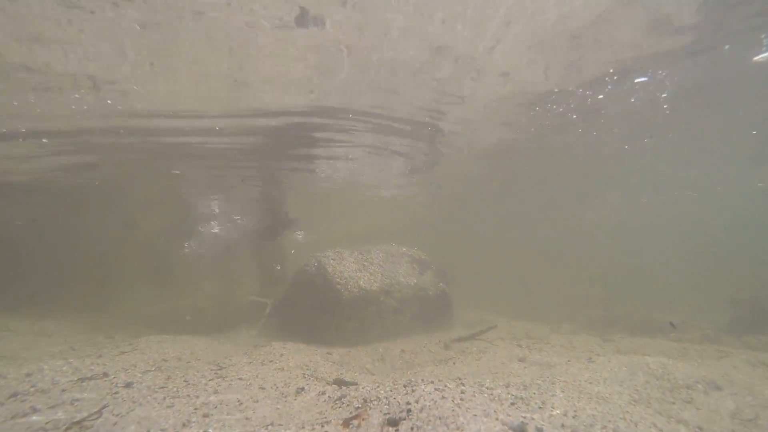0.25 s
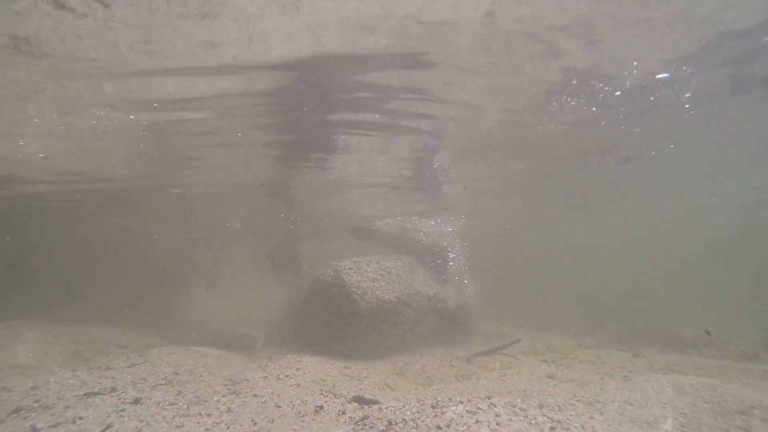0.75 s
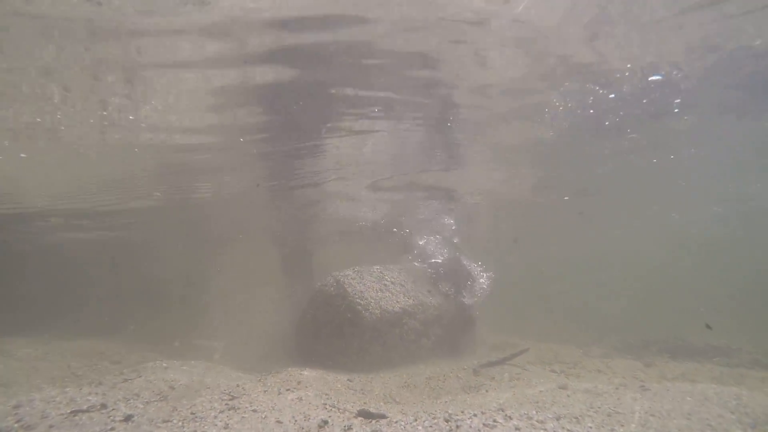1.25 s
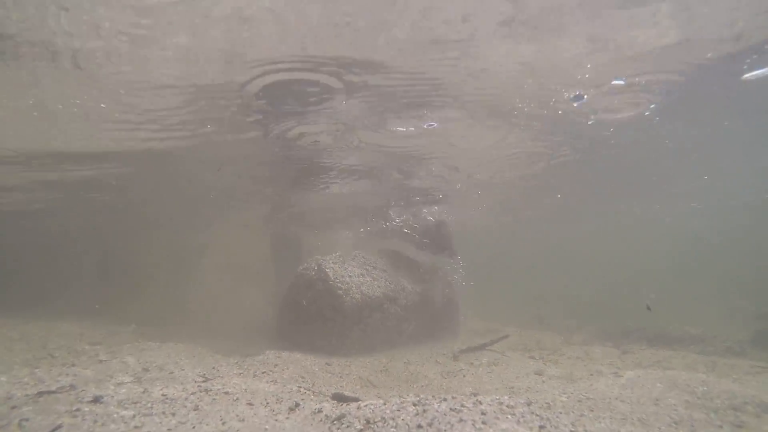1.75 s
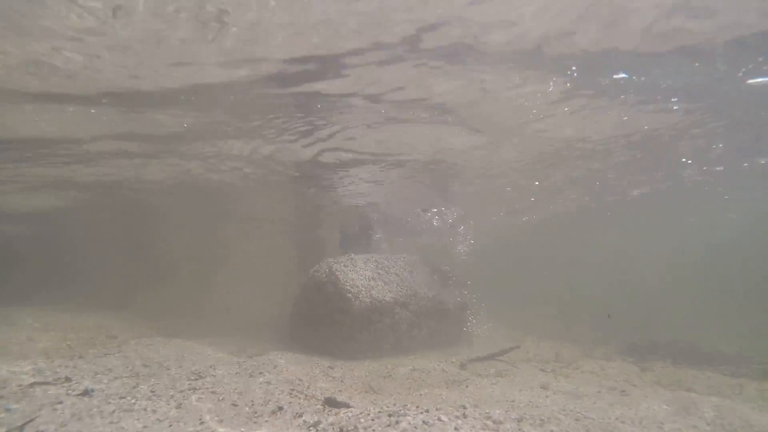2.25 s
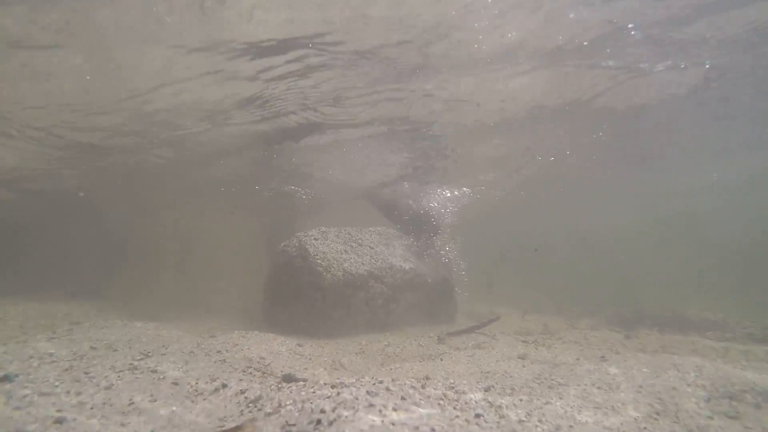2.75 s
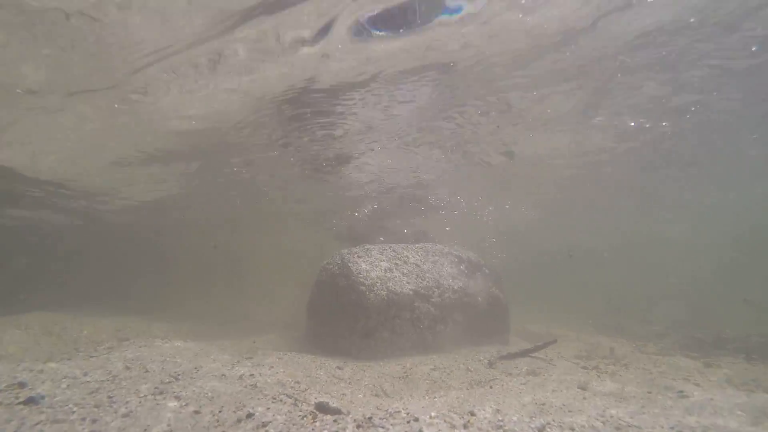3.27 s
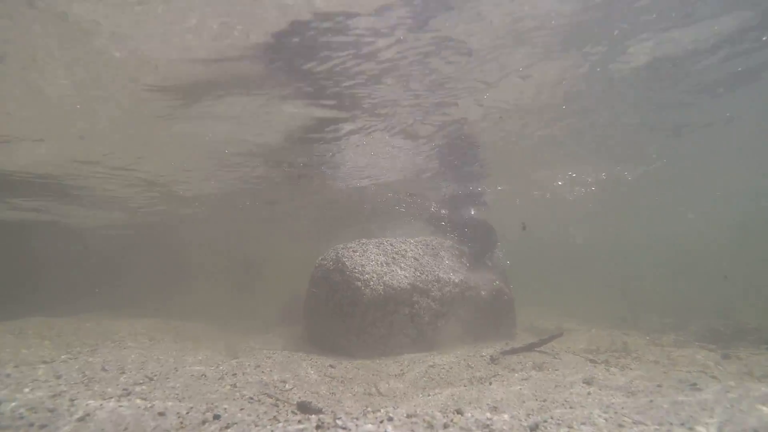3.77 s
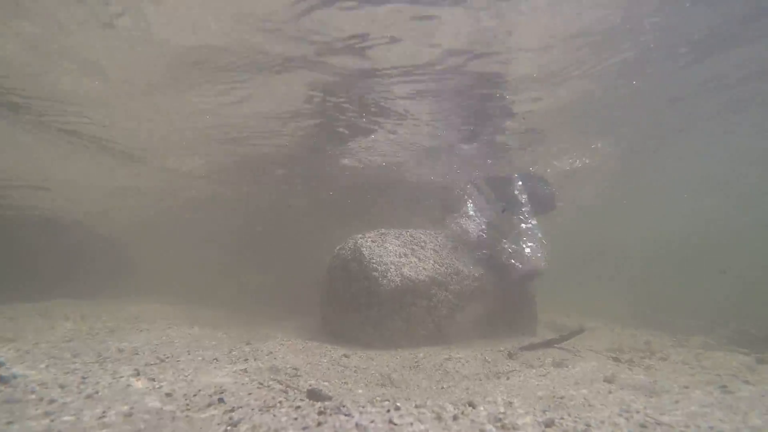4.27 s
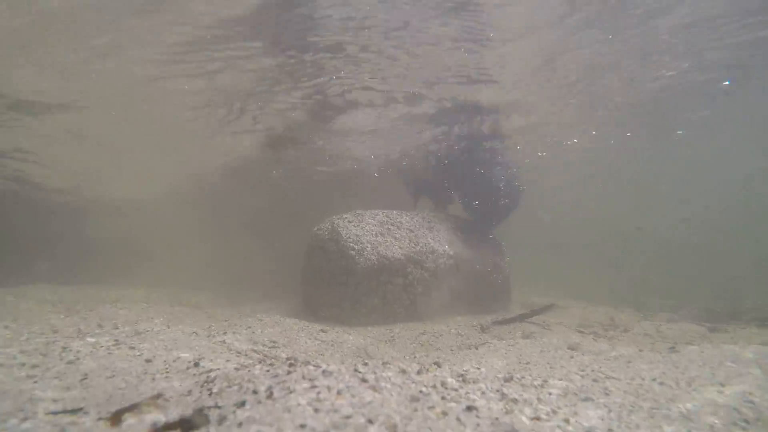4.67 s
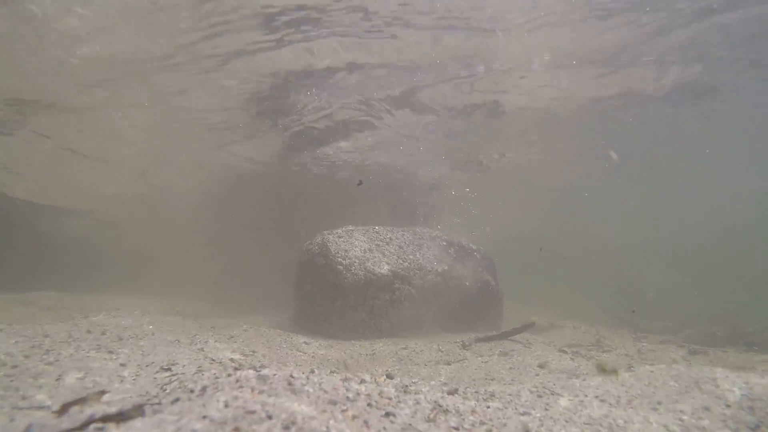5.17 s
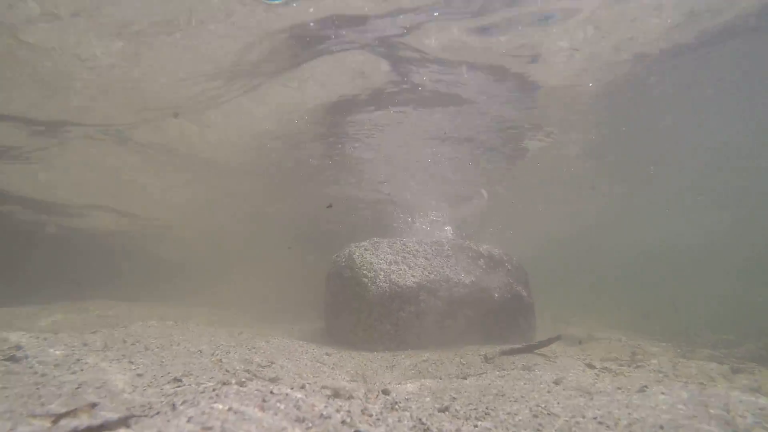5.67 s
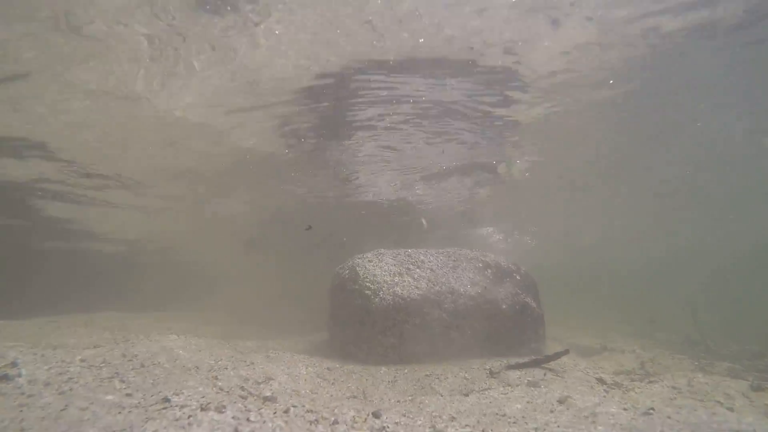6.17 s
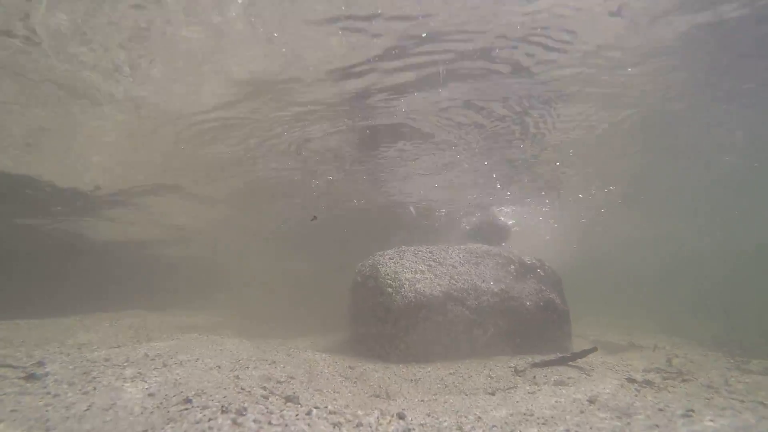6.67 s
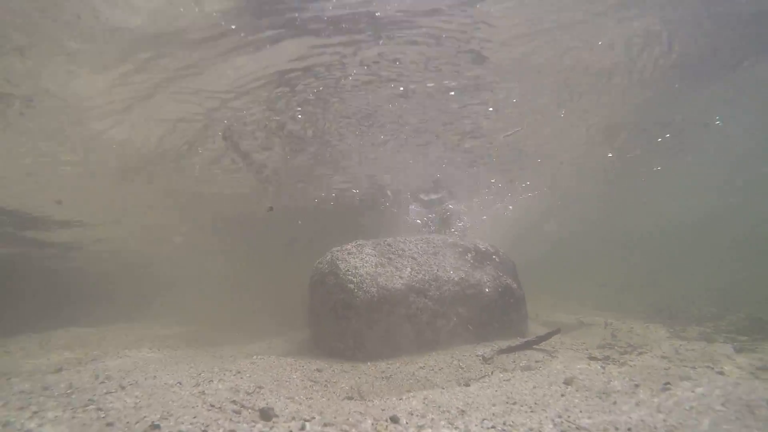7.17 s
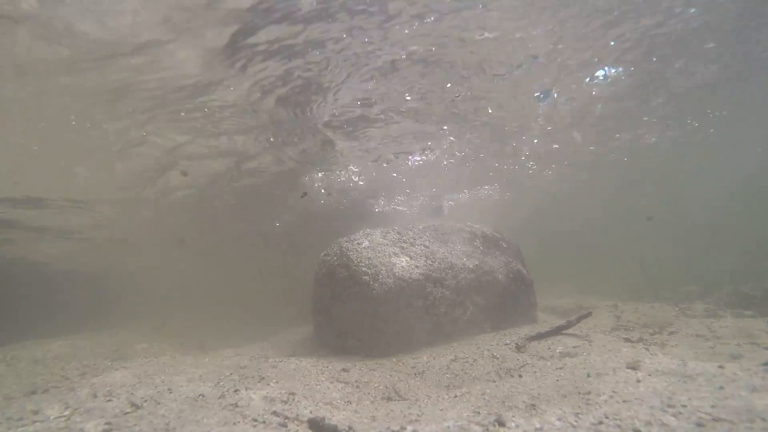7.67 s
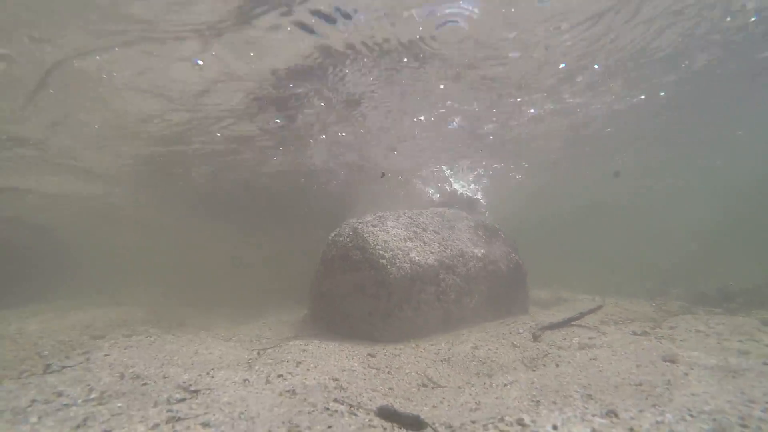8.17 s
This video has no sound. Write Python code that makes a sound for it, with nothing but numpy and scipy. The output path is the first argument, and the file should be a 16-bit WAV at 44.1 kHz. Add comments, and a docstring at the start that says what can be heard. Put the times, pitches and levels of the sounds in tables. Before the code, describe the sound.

A dog claws at a rock in a shallow stream, heard by a microphone in a waterproof housing underwater nearby. Shoved water rumbles and gurgles over a steady hiss and a faint thin whine. Claws slip across the stone in bright, gritty bursts, with dull paw thuds and small bubbles. The dog huffs faintly now and then. The scraping peaks past the middle, and near the end water splashes up and rains back.

```python
"""A dog claws at a rock in a shallow stream, heard by a camera in a waterproof housing on the sand nearby.
From the start, shoved water rumbles over hiss and a thin whine. A paw sifts sand, then claws slip over
the stone in gritty bursts that ring the housing, among bubbles and thudding blows, the hardest at 1.3 s.
From 2.4 s the dog huffs now and then. The clawing peaks near 5.6 s. At 7.9 s water splashes up and
rains back through the last scrapes."""
import sys
import numpy as np
from scipy import signal
from scipy.fft import rfft, irfft, next_fast_len
from scipy.io import wavfile
from scipy.ndimage import uniform_filter1d

SR = 44100
rng = np.random.default_rng(int(sys.argv[2]) if len(sys.argv) > 2 else 0)


def log_audio(samples):
    """Write samples as a 16-bit WAV file to the path given in sys.argv[1]."""
    # one column per channel
    frames = np.atleast_2d(samples).T
    # limit to full scale, then quantise
    limited = np.clip(frames, -1, 1)
    pcm = np.round(limited * 32767).astype(np.int16)
    wavfile.write(sys.argv[1], SR, pcm)


N = 371575
T = np.arange(N) / SR

# spectrum of stream and circuit hiss: freq_hz, relative_density_db
HISS_SPECTRUM = [(53, -30), (90, 1), (255, -11), (568, -17.5), (737, -19), (1040, -23), (1190, -22.5),
                 (4260, -27), (4650, -30), (7490, -30.5), (8720, -32), (9720, -35), (14700, -37),
                 (16000, -38)]
# restless water between jolts: time_s, surge_db, rocking_db, churn_db
RESTLESS_WATER = [(0.0, -48, -50, -65), (0.49, -49, -48.5, -56), (0.7, -46.5, -45.5, -51),
                  (1.27, -47.5, -54, -68), (1.48, -47, -38.5, -52.5), (1.74, -47.5, -50.5, -65.5),
                  (2.16, -39, -48, -53), (2.42, -45.5, -42.5, -62), (2.81, -43, -52, -52),
                  (3.19, -42.5, -50, -53), (4.06, -51, -48, -60.5), (4.48, -44, -47, -47.5),
                  (4.9, -42, -55.5, -60), (5.63, -44.5, -44.5, -50.5), (6.78, -51, -51, -56.5),
                  (7.16, -38, -47.5, -56), (8.12, -44, -43.5, -55.5), (8.43, -48, -52, -49)]
# surges of shoved water: start_s, length_s, level_db
WATER_SURGES = [(0.724, 0.043, -41.5), (1.1, 0.046, -43), (1.53, 0.046, -39), (2.072, 0.15, -40),
                (2.567, 0.1, -36.5), (2.716, 0.072, -34), (2.853, 0.29, -37), (3.22, 0.044, -39),
                (3.537, 0.13, -34.5), (3.76, 0.1, -35.5), (4.078, 0.17, -37.5), (4.304, 0.16, -37),
                (4.674, 0.13, -34.5), (5.128, 0.19, -39), (5.463, 0.083, -40.5), (5.66, 0.14, -41),
                (6.262, 0.055, -36), (6.365, 0.066, -35), (6.796, 0.037, -36.5), (6.896, 0.07, -41),
                (7.055, 0.35, -37), (7.572, 0.035, -46), (7.86, 0.096, -40), (8.242, 0.12, -40)]
# jolts that rock the housing: start_s, length_s, level_db
HOUSING_JOLTS = [(0.505, 0.052, -37), (0.631, 0.051, -38), (0.72, 0.066, -40), (0.876, 0.042, -36),
                 (0.987, 0.11, -34), (1.239, 0.048, -33), (1.322, 0.062, -34), (1.412, 0.055, -44),
                 (1.582, 0.093, -40), (1.908, 0.044, -40.5), (1.987, 0.037, -40), (2.095, 0.16, -36.5),
                 (2.391, 0.046, -42.5), (2.601, 0.14, -34.5), (2.728, 0.031, -45), (2.784, 0.035, -52),
                 (2.817, 0.055, -38.5), (2.882, 0.19, -37.5), (3.113, 0.023, -37), (3.207, 0.073, -41),
                 (3.306, 0.043, -38), (3.442, 0.047, -44), (3.516, 0.12, -33), (3.717, 0.026, -35),
                 (3.744, 0.27, -36.5), (4.076, 0.049, -44), (4.153, 0.062, -35.5), (4.336, 0.089, -28.5),
                 (4.541, 0.066, -34.5), (4.627, 0.023, -43), (4.68, 0.06, -40.5), (4.767, 0.035, -44),
                 (5.003, 0.047, -37), (5.135, 0.076, -37.5), (5.22, 0.054, -38), (5.45, 0.03, -42),
                 (5.487, 0.065, -37.5), (5.606, 0.034, -48), (5.988, 0.084, -30.5), (6.318, 0.119, -38.5),
                 (6.449, 0.041, -38.5), (6.765, 0.057, -36), (6.828, 0.035, -43), (6.895, 0.055, -39.5),
                 (7.145, 0.055, -36.5), (7.252, 0.072, -36.5), (7.75, 0.029, -41), (7.906, 0.044, -35.5),
                 (8.008, 0.047, -42), (8.264, 0.048, -36.5), (8.356, 0.029, -46), (8.394, 0.039, -37)]
# churned water and gravel: start_s, length_s, level_db, upper_re_level_db
CHURN_BURSTS = [(0.864, 0.03, -49.5, -5), (0.97, 0.046, -46, -8), (1.036, 0.039, -46.5, -8.5),
                (1.318, 0.095, -41.5, -14.5), (1.429, 0.042, -50, -8), (1.51, 0.14, -45.5, -5.5),
                (1.929, 0.059, -47, -3.5), (2.01, 0.034, -51, -5), (2.077, 0.04, -49, 0),
                (2.185, 0.116, -45, -3.5), (2.583, 0.089, -45.5, -6), (2.75, 0.072, -45.5, -7.5),
                (2.906, 0.028, -47.5, -13), (3.421, 0.14, -40, -17.5), (3.61, 0.024, -42, -14),
                (3.761, 0.027, -45.5, -7), (3.83, 0.043, -45.5, -10.5), (3.925, 0.042, -47, -5),
                (3.99, 0.04, -51, 0.5), (4.012, 0.027, -56, -4), (4.143, 0.065, -43, -8),
                (5.062, 0.041, -47, -11), (5.132, 0.059, -46.5, -6), (5.199, 0.038, -46, -6),
                (5.24, 0.028, -48, -13), (5.415, 0.096, -44.5, -10), (5.537, 0.044, -48, -9),
                (5.604, 0.13, -41, -8), (5.946, 0.081, -44.5, -11.5), (7.229, 0.056, -45.5, -9),
                (7.918, 0.029, -46, -8), (7.943, 0.1, -46.5, -7), (8.35, 0.037, -53, -5)]
# single bubbles and pebble knocks: start_s, peak_db, pitch_hz, t60_s
BUBBLE_TONES = [(.553, -62, 690, 0.027), (2.279, -52, 2400, 0.014), (2.602, -42, 2380, 0.0073),
                (3.611, -44, 2000, .027), (3.62, -42, 680, 0.027), (4.343, -57, 617, .028),
                (4.369, -53, 714, 0.096), (5.543, -39, 1810, 0.0066), (5.548, -38, 1680, 0.012),
                (5.549, -41, 810, 0.014), (5.983, -48.5, 724, 0.044), (6.115, -53.5, 754, .035),
                (6.299, -51, 640, .033), (7.094, -59, 700, 0.028), (7.167, -48, 715, 0.022)]
# huffs above the surface: start_s, length_s, level_db
DOG_HUFFS = [(2.44, 0.047, -50.5), (3.11, 0.034, -64), (3.605, 0.04, -46.5), (3.77, 0.037, -59.5),
             (5.24, .06, -66), (7.165, 0.012, -58)]
# throat and muzzle resonances: freq_hz, width_hz, gain_db
THROAT_MODES = [(840, 900, 1.5), (1890, 450, 6.5), (3080, 970, 9), (3940, 450, -3), (6200, 440, -5)]
# paw blows on the rock: start_s, peak_db, pitch_hz, t60_s
PAW_BLOWS = [(0.854, -41, 186, 0.055), (1.044, -39, 140, 0.094), (1.331, -23.5, 145, 0.048),
             (1.431, -39, 110, 0.067), (1.533, -34, 141, 0.047), (1.563, -34, 181, 0.037),
             (1.62, -43, 178, 0.11), (1.939, -36, 175, 0.052), (2.094, -37, 112, 0.066),
             (2.19, -36, 163, 0.24), (2.227, -38, 165, 0.097), (2.607, -33, 137, 0.077),
             (2.779, -47, 111, 0.04), (3.422, -51, 195, 0.15), (3.493, -28.5, 167, 0.12),
             (3.909, -51, 152, 0.06), (4.168, -34, 121, 0.16), (5.684, -27.5, 193, 0.041),
             (5.995, -32.5, 188, 0.12), (6.012, -24.5, 152, 0.046), (7.922, -61, 127, 0.18),
             (8.283, -51, 110, 0.06)]
# housing resonances, the deep ones woken by firm contact: freq_hz, width_hz, gain_db
DEEP_MODES = [(2720, 200, -19.5), (4020, 1320, -4.5), (4523, 365, 7)]
BODY_MODES = [(3604, 190, -6), (4830, 280, 0), (5380, 490, -3), (5787, 680, 3.5), (6408, 620, -1)]
TREBLE_MODES = [(7620, 500, 5), (7760, 340, 3), (9160, 1500, 1.5), (10420, 1600, 3), (11300, 340, -18),
                (12200, 410, -1.5), (14330, 1200, -10), (14800, 1100, -33)]
# colour of fine sand and tiny bubbles: freq_hz, width_hz, gain_db
SPARKLE_MODES = [(9350, 1400, -1.5), (10730, 1500, 0.5), (12700, 1100, -8), (14300, 1500, -8.5)]
# tiny bubbles snapping near the housing: peak_s, level_db
BUBBLE_SNAPS = [(.131, -63), (.19, -58), (.56, -52), (1.229, -59), (3.288, -56), (3.546, -56), (4.1, -62),
                (6.022, -53.5), (6.111, -65), (6.13, -63), (7.3735, -60), (7.762, -58)]
# paw sifting loose sand: start_s, length_s, level_db, treble_re_level_db
SAND_SIFTS = [(0.105, 0.12, -84, 7), (0.216, 0.14, -68.5, 2.5), (0.458, .32, -67, -7),
              (1.213, 0.055, -75, 5.5), (1.29, 0.16, -63, -6), (1.814, 0.23, -69.5, -3.5),
              (2.53, 0.48, -68, -5), (3.133, 0.053, -66, -1.5), (3.284, 0.083, -68, -4),
              (3.601, 0.03, -59, -7), (3.72, 0.13, -68, -5), (4.02, 0.2, -80.5, 9), (4.283, 0.4, -68, -6),
              (6.33, 0.18, -63.5, -6), (6.76, .1, -68, -14), (7.126, .09, -66, -4), (7.493, 0.093, -67, -1),
              (7.733, 0.028, -65, -17), (7.823, .09, -66.5, -9), (8.01, 0.047, -69, -3),
              (8.23, 0.14, -66, -7)]
# paw dragged over stone: start_s, end_s, level_db, treble_re_body_db, deep_re_body_db
PAW_STROKES = [(0.466, 0.475, -55, -6, -7), (0.583, 0.61, -58, -6, -6), (0.721, 0.729, -51, -12.5, -8),
               (0.846, 0.874, -48.5, -12.5, -7), (0.962, 1.019, -43, -9.5, -15),
               (1.023, 1.077, -55.5, -6.5, -9), (1.306, 1.326, -56.5, -11, -8),
               (1.508, 1.537, -53.5, -13, -8.5), (1.541, 1.606, -48.5, -6, -26),
               (1.599, 1.652, -49, -8.5, -14), (1.911, 2, -55.5, -8, -8), (1.992, 2.028, -56.5, -6, -8),
               (2.063, 2.123, -59, -10, -6.5), (2.19, 2.274, -46, -4.5, -10.5),
               (2.544, 2.58, -56.5, -11, -8), (2.587, 2.611, -59, -7, -2), (2.716, 2.738, -66, -12, -32),
               (2.747, 2.83, -52.5, -12, -2.5), (2.87, 2.905, -58, -13, -6),
               (2.911, 2.971, -48.5, -12.5, -3), (2.97, 3.016, -56.5, -9, -1), (3.317, 3.34, -55, -4, -0.5),
               (3.398, 3.436, -52, -10.5, -3), (3.436, 3.471, -61, -7, -4.5),
               (3.485, 3.526, -48.5, -15.5, -8), (3.76, 3.773, -51.5, -14, -4), (3.82, 3.85, -58, -7, -4),
               (3.901, 3.959, -48, -12, 0), (3.959, 4.016, -47.5, -15.5, -1), (4.304, 4.333, -60, -7, -3),
               (4.364, 4.404, -55.5, -8.5, 0), (4.43, 4.46, -56, -16, -3), (4.536, 4.612, -48, -16, 3.5),
               (4.613, 4.682, -53.5, -18, 1), (4.691, 4.707, -52, -12, 6), (4.719, 4.733, -49, -18, 3.5),
               (4.799, 4.818, -60, -28, 2), (5.125, 5.137, -46, -9, 4), (5.15, 5.212, -44, -12.5, -2),
               (5.446, 5.46, -49, -6, 2), (5.475, 5.504, -56.5, 0, 0), (5.538, 5.556, -46, -14, -3),
               (5.558, 5.584, -48.5, -6, -8), (5.584, 5.643, -38.5, -11, -10), (5.63, 5.7, -43, -11, -2.5),
               (6.334, 6.349, -55.5, -4, -1.5), (6.424, 6.44, -59, -7, 1), (6.466, 6.528, -48, -3.5, 0),
               (6.52, 6.57, -41.5, -7.5, -4), (6.572, 6.594, -50.5, -13, -2), (6.75, 6.76, -49.5, -9, -4),
               (6.796, 6.871, -55, -11, 5), (6.865, 6.94, -43, -11.5, 0.5), (7.203, 7.263, -44, -13.5, 1),
               (7.247, 7.329, -42.5, -14, -1), (7.484, 7.503, -55, -3, -2), (7.558, 7.623, -44, -7.5, -9.5),
               (7.623, 7.679, -48.5, -9.5, 2), (7.914, 7.965, -48, -3, -2.5), (7.97, 8.017, -44.5, -7, -7),
               (8.272, 8.306, -53.5, -12, 0.5), (8.317, 8.38, -45, -6.5, -7.5)]
# claw slips that stand out: peak_s, level_db
CLAW_SLIPS = [(0.254, -49), (0.309, -47), (0.4926, -41.5), (0.6777, -45), (0.8205, -52), (0.847, -40),
              (0.8643, -32), (0.881, -50), (0.964, -58), (0.9885, -30), (1.0075, -35.5), (1.0363, -32),
              (1.0507, -41.5), (1.066, -38), (1.32, -39.5), (1.4325, -43), (1.52, -36.5), (1.5956, -31),
              (1.6143, -35), (1.9074, -47), (1.936, -46), (1.987, -49), (2.0654, -39.5), (2.0908, -36.5),
              (2.107, -40.5), (2.1864, -35), (2.2156, -38), (2.2327, -36.5), (2.2539, -35), (2.6237, -52),
              (2.7167, -44), (2.7402, -39.5), (2.7743, -39.5), (2.784, -46), (2.8741, -41), (2.9121, -36),
              (2.942, -47), (2.9628, -38), (2.9944, -39.5), (3.1503, -50.5), (3.1628, -51), (3.224, -45),
              (3.3043, -47), (3.3323, -41.5), (3.3512, -48), (3.3991, -38.5), (3.4233, -32), (3.4399, -35),
              (3.4546, -38.5), (3.491, -40), (3.5013, -29), (3.5073, -39), (3.5154, -31), (3.7215, -43.5),
              (3.764, -50), (3.7888, -44.5), (3.8385, -42), (3.9055, -39.5), (3.929, -38), (3.9405, -46),
              (3.9588, -33.5), (3.9824, -28), (4.0019, -26), (4.3571, -58), (4.3952, -45.5), (4.5396, -45),
              (4.59, -35.5), (4.6415, -42.5), (4.7275, -33), (4.804, -49), (4.836, -49), (4.9487, -51),
              (5.061, -42.5), (5.0881, -37.5), (5.136, -36.5), (5.157, -28), (5.179, -37), (5.2073, -35),
              (5.449, -34), (5.5243, -34), (5.56, -27), (5.5689, -35), (5.5823, -40), (5.594, -45),
              (5.607, -30), (5.6227, -27), (5.6369, -30), (5.646, -26), (5.657, -24.5), (5.665, -26),
              (5.6714, -28), (5.679, -29), (5.6893, -29.5), (5.697, -42), (6.331, -43), (6.4253, -52),
              (6.467, -44), (6.48, -42), (6.539, -38.5), (6.563, -34.5), (6.7123, -54), (6.802, -47),
              (6.8358, -44.5), (6.8597, -42), (6.882, -33.5), (6.905, -32), (6.955, -56), (7.1208, -46),
              (7.166, -45), (7.2059, -42.5), (7.2343, -35.5), (7.2497, -33), (7.268, -28.5), (7.288, -32),
              (7.3086, -40), (7.525, -49), (7.5427, -46), (7.5751, -51), (7.6025, -46), (7.6339, -34.5),
              (7.6533, -41), (7.84, -50.5), (7.8652, -43.5), (7.9285, -42), (7.9558, -37), (7.967, -29.5),
              (7.9816, -32.5), (7.99, -36), (8.2231, -38.5), (8.2879, -37), (8.3248, -42), (8.354, -28.5),
              (8.3612, -31.5), (8.3693, -33), (8.376, -40)]


def undb(db):
    return 10 ** (np.asarray(db) / 20)


def unit_rms(x):
    return x / np.sqrt(np.mean(x ** 2))


def noise():
    return rng.standard_normal(N)


def resonate(x, hz, width_hz):
    """A resonance applied twice for steep skirts."""
    b, a = signal.iirpeak(hz, hz / width_hz, fs=SR)
    return signal.lfilter(b, a, signal.lfilter(b, a, x))


def band(lo_hz, hi_hz, steady=0.):
    """Band noise of rms 1; steady (0-1) flattens its swells."""
    x = signal.sosfiltfilt(signal.butter(2, [lo_hz, hi_hz], "band", fs=SR, output="sos"), noise())
    envelope = np.abs(signal.hilbert(x, next_fast_len(N))[:N])
    return unit_rms(x / (envelope + 1.04 * envelope.mean()) ** steady)


def flicker(rate_hz, spread_db):
    """Gain gliding between random levels."""
    hold = int(SR / rate_hz)
    steps = np.repeat(rng.standard_normal(N // hold + 1), hold)
    return undb(spread_db * np.sqrt(3 / 2) * uniform_filter1d(steps, hold)[:N])


def swells(rows, rise_s, fall_s, rest_db=-np.inf):
    """Envelope of rows (start_s, length_s, level_db) over a rest level: rise to the start, hold, fall."""
    power = np.zeros(N)
    for start_s, length_s, level_db, *_ in rows:
        outside = np.maximum((start_s - T) / rise_s, (T - start_s - length_s) / fall_s).clip(0)
        power += undb(2 * level_db) * np.exp(-2 * outside)
    return np.hypot(np.sqrt(power), undb(rest_db))


def upper_rows(rows):
    return [(start_s, length_s, db + offset_db) for start_s, length_s, db, offset_db in rows]


def pulses(spikes, rise_s, fall_s):
    """Widen each spike to a lopsided Gaussian."""
    t = np.arange(-512, 513) / SR
    shape = np.exp(-(t / np.where(t < 0, rise_s, fall_s)) ** 2)
    return signal.fftconvolve(spikes, shape, "same").clip(0)


def damped_tones(rows, rise_s, glide):
    """Decaying sines; pitch climbs by the fraction glide over t60_s."""
    out = np.zeros(N + SR)
    for start_s, peak_db, pitch_hz, t60_s in rows:
        t = np.arange(int(t60_s * SR)) / SR
        envelope = (1 - np.exp(-t / rise_s)) * undb(-60 * t / t60_s)
        tone = np.sin(2 * np.pi * pitch_hz * (t + glide * t ** 2 / (2 * t60_s)))
        i = int(start_s * SR)
        out[i:i + len(t)] += undb(peak_db) * envelope / envelope.max() * tone
    return out[:N]


def hiss(level_db=-60.5):
    """Broad noise of stream and circuit."""
    bins_hz = np.fft.rfftfreq(N, 1 / SR)
    freq_hz, density_db = np.transpose(HISS_SPECTRUM)
    shape_db = np.interp(np.log(bins_hz + 1), np.log(freq_hz), density_db, left=-120)
    coloured = irfft(rfft(noise()) * undb(shape_db), N)
    return undb(level_db) * unit_rms(coloured) * flicker(4.9, 0.69)


def camera_whine(pitch_hz=8570, frame_hz=60, level_db=-79):
    """A thin tone that pulses once a frame."""
    pulse = np.exp(1.5 * np.cos(2 * np.pi * frame_hz * T))
    return undb(level_db) * unit_rms(pulse * np.sin(2 * np.pi * pitch_hz * T))


def gurgle(lo_hz, hi_hz, kicks_per_s, step_db, damping, count):
    """Air pockets and loose stones of several sizes, kicked at random, ring a few cycles."""
    out = 0
    for k, hz in enumerate(np.geomspace(lo_hz, hi_hz, count)):
        kicks = (rng.random(N) < kicks_per_s / SR) * noise() + 0.013 * noise()
        out += undb(step_db * k) * unit_rms(resonate(kicks, hz, damping * hz))
    return unit_rms(out)


def water_rumble():
    """Water surges, rocks the housing on the sand and churns around the stone."""
    time_s, *levels_db = np.transpose(RESTLESS_WATER)
    surge_db, rocking_db, churn_db = (np.interp(T, time_s, db) for db in levels_db)
    upper = gurgle(210.4, 322, kicks_per_s=25, step_db=-0.71, damping=0.21, count=5)
    upper += undb(-13) * gurgle(404, 717, kicks_per_s=30, step_db=-1.3, damping=0.17, count=4)
    lower = gurgle(103.7, 175, kicks_per_s=39, step_db=-1.58, damping=0.3, count=4)
    surge = swells(WATER_SURGES, 0.0083, 0.0083, surge_db) * band(18.8, 36.6, steady=0.93)
    rocking = swells(HOUSING_JOLTS, 0.0082, 0.0082, rocking_db) * band(39, 67.7, steady=0.67)
    churn = swells(CHURN_BURSTS, 0.0038, 0.0064, churn_db) * lower
    froth = swells(upper_rows(CHURN_BURSTS), 0.0038, 0.0064, churn_db - 8.5) * upper
    return surge + rocking + churn + froth


def bubbles():
    """Single bubbles and knocked pebbles ring briefly."""
    return damped_tones(BUBBLE_TONES, rise_s=0.0004, glide=0.042)


def splash(start_s=7.886, hold_s=0.144, spray_lag_s=0.013, edge_s=0.0094):
    """Water bursts out, holds and rains back: spray hisses over gurgling air pockets."""
    def burst(onset_s, level_db, rain_db):
        end_s = start_s + hold_s
        thrown = swells([(onset_s, end_s - onset_s, level_db)], rise_s=0.002, fall_s=edge_s)
        rain = swells([(end_s, 0, rain_db)], rise_s=edge_s, fall_s=0.34)
        return np.hypot(thrown, rain)
    spray = unit_rms(resonate(noise(), 2230, 500)) + undb(3) * band(1400, 4000)
    pockets = unit_rms(resonate(noise(), 613, 180))
    pockets += undb(-1.5) * band(560, 1280) + undb(-8) * band(340, 500)
    spray_gain = burst(start_s + spray_lag_s, level_db=-52, rain_db=-59.5) * flicker(90, 2)
    pocket_gain = burst(start_s, level_db=-49, rain_db=-55) * flicker(60, 1.5)
    return spray_gain * unit_rms(spray) + pocket_gain * unit_rms(pockets)


def huffs():
    """Breath noise through throat and muzzle resonances."""
    breath = sum(undb(db) * resonate(noise(), hz, width_hz) for hz, width_hz, db in THROAT_MODES)
    return swells(DOG_HUFFS, rise_s=0.015, fall_s=0.0077) * flicker(90, 1) * unit_rms(breath)


def paw_thuds():
    """Blows on the rock arrive as low damped tones."""
    return damped_tones(PAW_BLOWS, rise_s=0.0015, glide=0.027)


def grains(per_s, scatter_db, bed):
    """Envelope of random grains, a few large, on a bed of finer ones."""
    spikes = (rng.random(N) < per_s / SR) * undb(scatter_db * rng.exponential(size=N))
    return unit_rms(pulses(spikes, rise_s=0.00057, fall_s=0.00051) + bed)


def snaps(rows, scatter_db=0, rise_s=0.0007, tail_db=-17.5):
    """Envelope of slips or bubble snaps: a sharp peak, then a crumbling tail."""
    peak_s, level_db = np.transpose(rows)
    if scatter_db:
        level_db = level_db + scatter_db * rng.standard_normal(len(rows))
    spikes = np.zeros(N)
    spikes[(peak_s * SR).astype(int)] = undb(level_db)
    return pulses(spikes, rise_s, fall_s=0.001) + undb(tail_db) * pulses(spikes, rise_s, fall_s=0.004)


def chatter(modes, envelope):
    """Noise-driven modes under one envelope; each wavers as the contact point moves."""
    out = power = 0
    for hz, width_hz, gain_db in modes:
        drive = noise() * envelope * flicker(rate_hz=14, spread_db=1.5)
        out += undb(gain_db) * resonate(drive, hz, width_hz)
        power += undb(2 * gain_db) * width_hz * np.pi / 4 / SR
    return out / np.sqrt(power)


def claws(slip_treble_db=-13.5, sand_deep_db=-3.5):
    """Slips, dragged grit, sifted sand and snapping bubbles ring the housing."""
    sand = swells(SAND_SIFTS, 0.0066, 0.019, rest_db=-76.5)
    fizz = swells(upper_rows(SAND_SIFTS), 0.0066, 0.019, rest_db=-80)
    pressure = np.zeros(N)
    treble_db = np.full(N, slip_treble_db)
    starts_s, *_, strokes_deep_db = np.transpose(PAW_STROKES)
    deep_db = np.interp(T, starts_s, strokes_deep_db) + sand_deep_db  # loose sand wakes the deep ring less
    for start_s, end_s, level_db, bright_db, ring_db in PAW_STROKES:
        held = slice(int(start_s * SR), int(end_s * SR))
        pressure[held] = undb(level_db)
        sand[held] = fizz[held] = 0
        treble_db[held], deep_db[held] = bright_db, ring_db
    grit = grains(per_s=300, scatter_db=2.95, bed=0.56) * uniform_filter1d(pressure, 45)
    treble = np.hypot(snaps(CLAW_SLIPS, scatter_db=1), grit) * uniform_filter1d(undb(treble_db), 100)
    body = np.hypot(snaps(CLAW_SLIPS), grit + grains(per_s=250, scatter_db=2.4, bed=0.49) * sand)
    sparkle = grains(per_s=250, scatter_db=1.7, bed=0.4) * fizz + snaps(BUBBLE_SNAPS)
    deep_share = uniform_filter1d(1 / (1 + undb(-2 * deep_db)), 100)
    return (chatter(DEEP_MODES, body * np.sqrt(deep_share))
            + chatter(BODY_MODES, body * np.sqrt(1 - deep_share))
            + chatter(TREBLE_MODES, treble) + chatter(SPARKLE_MODES, sparkle))


def scene():
    mix = claws() + water_rumble() + paw_thuds() + huffs() + splash() + bubbles()
    return (mix + hiss() + camera_whine())[None]


def record(dry, cutoff_hz=15350):
    """The camera cuts the top."""
    return signal.sosfilt(signal.ellip(8, .2, 70, cutoff_hz, fs=SR, output="sos"), dry)


dry = scene()
out = record(dry)
log_audio(out)
```